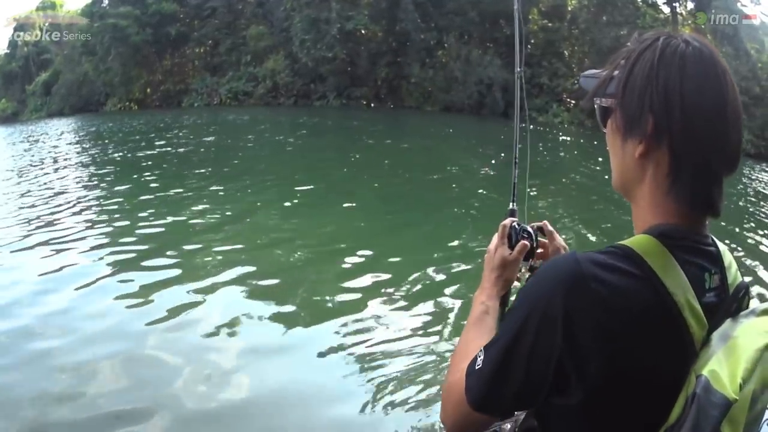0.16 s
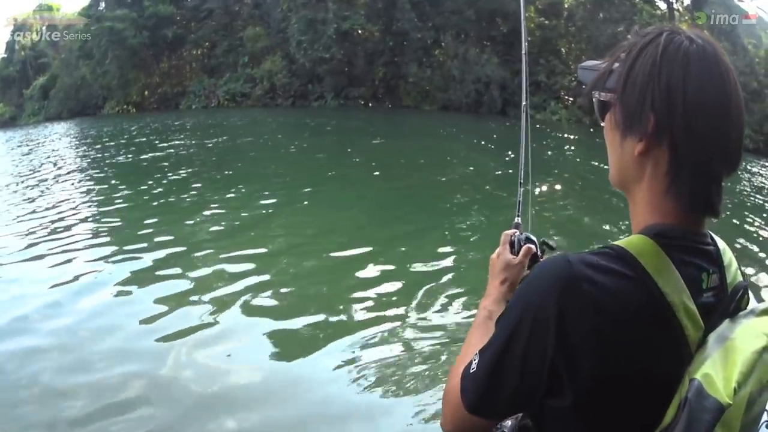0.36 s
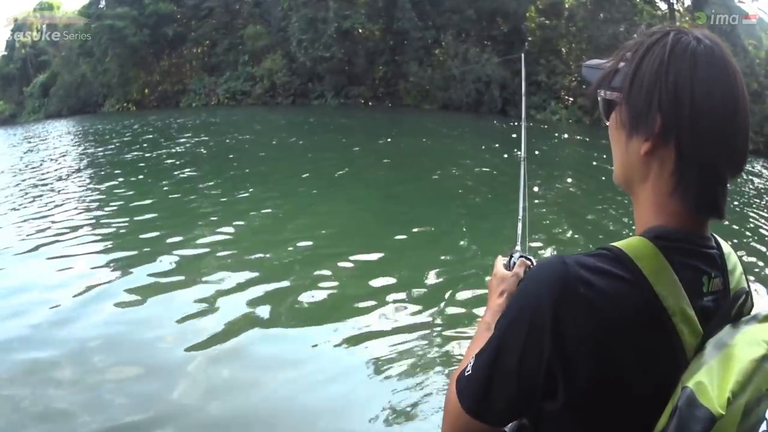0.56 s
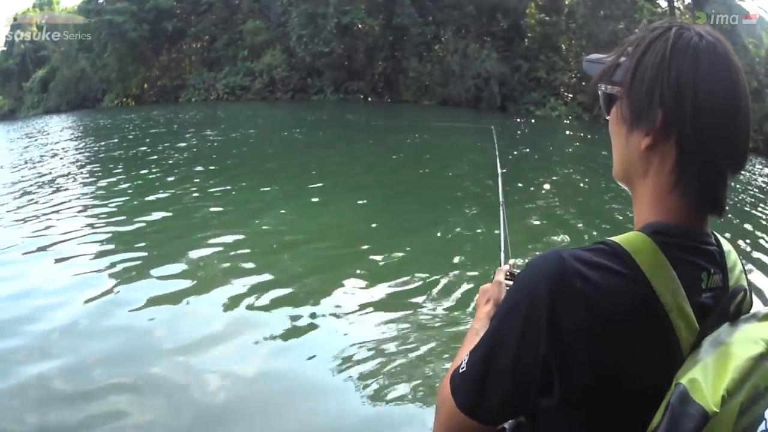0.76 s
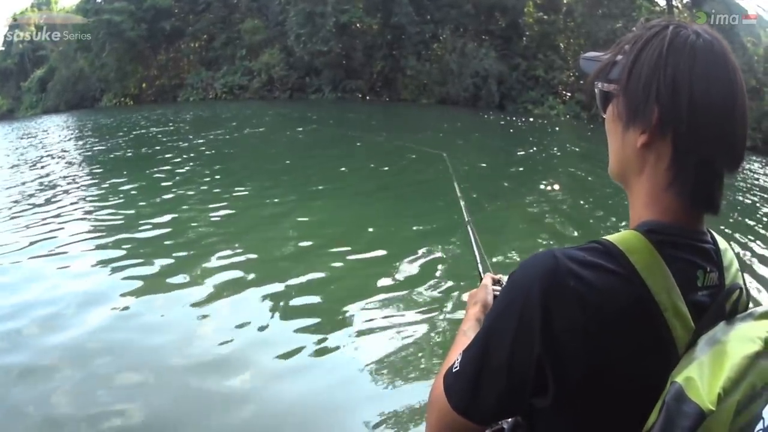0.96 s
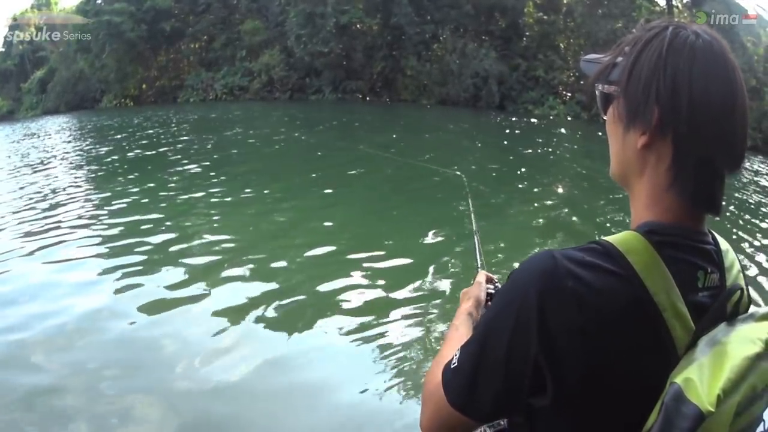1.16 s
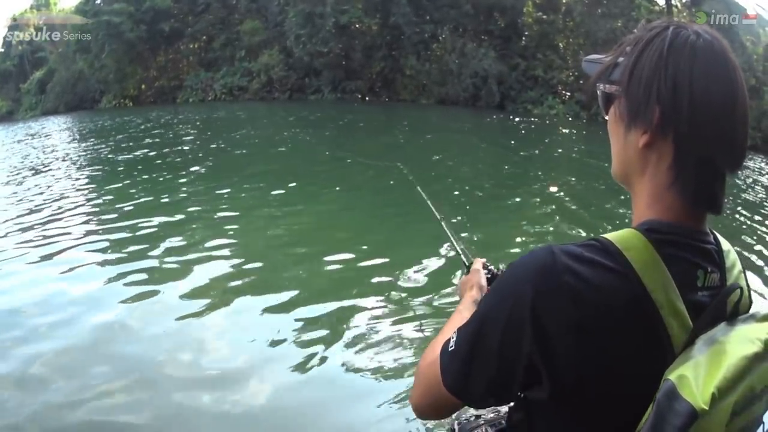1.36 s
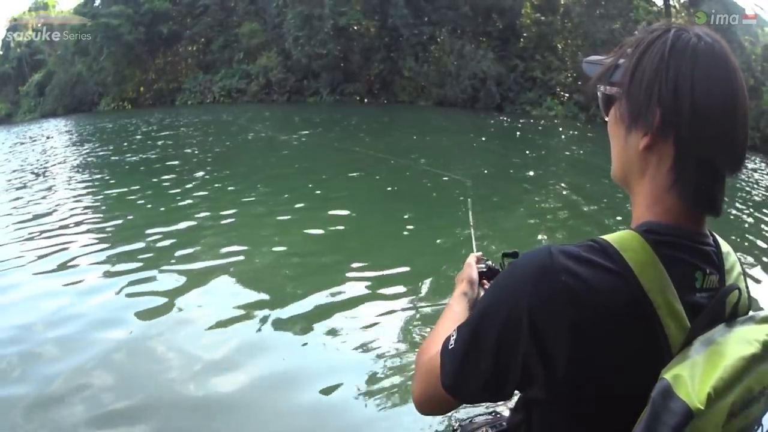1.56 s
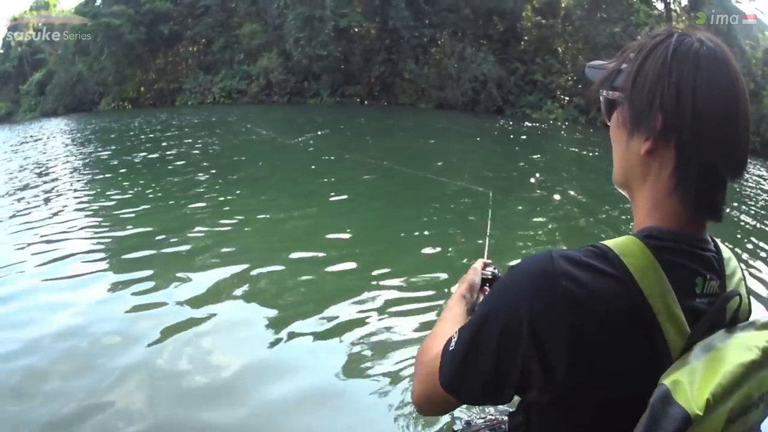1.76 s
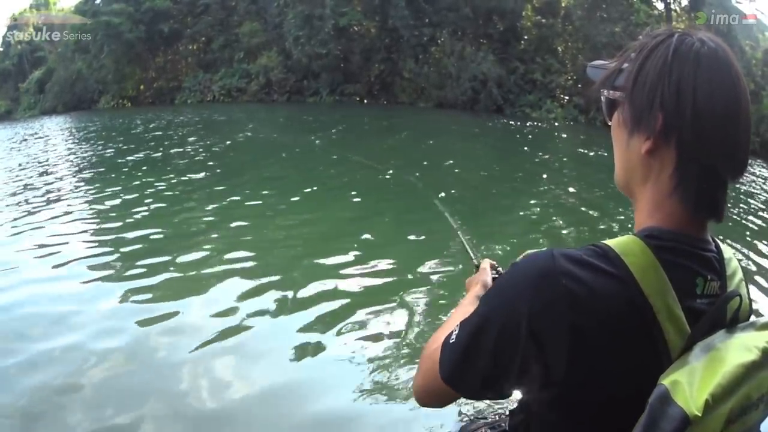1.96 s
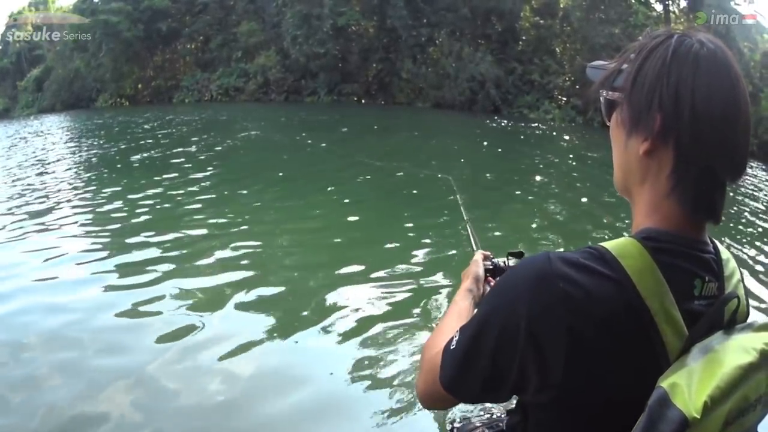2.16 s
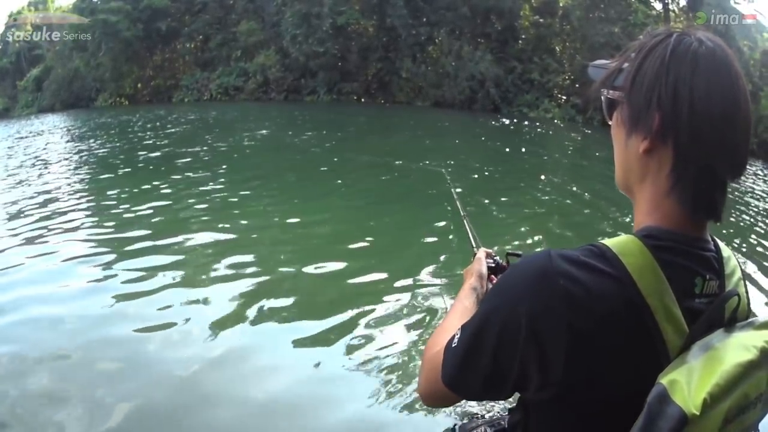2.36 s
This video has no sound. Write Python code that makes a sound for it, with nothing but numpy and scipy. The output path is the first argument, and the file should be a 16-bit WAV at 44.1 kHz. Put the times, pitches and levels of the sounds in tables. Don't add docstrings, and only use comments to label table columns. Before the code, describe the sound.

A fishing reel close to the microphone: a brief airy rod swish, two very quick metallic snaps with a springy ring, then a bird trilling in the trees, and finally light gear rubs and ticks beside a pond.

```python
import sys
import numpy as np
from scipy import signal
from scipy.fft import rfft, irfft
from scipy.io import wavfile
from scipy.ndimage import uniform_filter1d

SR = 44100
rng = np.random.default_rng(int(sys.argv[2]) if len(sys.argv) > 2 else 0)


def voltage_ratio(decibels):
    exponent = np.asarray(decibels, float) / 20
    return 10 ** exponent


def to_wav(sig):
    pcm = np.clip(np.atleast_2d(sig), -1, 1) * 32767
    pcm = np.round(pcm).astype(np.int16)
    wavfile.write(sys.argv[1], SR, pcm.T)


N = 105840

# frequency_hz, density_db
FRICTION_SPECTRUM = [(200, -30), (500, -5), (1200, -2), (2500, 0), (6000, -0.5), (10200, -4.5),
                     (11500, -17)]


def evened(x):
    return x / np.sqrt(np.mean(x ** 2) + 1e-20)


def read(points, hz):
    f, value = np.transpose(points)
    return np.interp(np.log(hz + 1), np.log(f + 1), value)


def add(mix, start_s, sound):
    part = mix[round(start_s * SR):][:len(sound)]
    part += sound[:len(part)]


def resonate(x, hz, width_hz):
    turn = np.exp(2j * np.pi * hz * np.arange(len(x)) / SR)
    r = np.exp(-np.pi * width_hz / SR)
    return 2 * (turn * signal.lfilter([1 - r], [1, -r], x / turn)).real


def coloured(points):
    gain = voltage_ratio(read(points, np.fft.rfftfreq(N, 1 / SR)))
    return evened(irfft(rfft(rng.standard_normal(N)) * gain, N))


def damped_modes(t, modes):
    return sum(voltage_ratio(db - 60 * t / t60) * np.sin(2 * np.pi * hz * t) for hz, db, t60 in modes)


def echoes(x, t60, gap_s):
    t = np.arange(SR // 2) / SR
    taps = rng.standard_normal((2, len(t))) * (rng.random((2, len(t))) < .3)
    taps = taps * voltage_ratio(-60 * t / t60) * (t > gap_s)
    taps = taps[0] + 0.8 * taps
    return signal.fftconvolve(x[None], taps / np.linalg.norm(taps[0]), axes=1)[:, :N]


def ports(pair, lead):
    # frequency_hz, left_minus_right_db
    contrast = [(60, -.3), (500, -.5), (1400, -1), (3000, -2), (6000, -1.3), (11000, -.8)]
    hz = np.fft.rfftfreq(N, 1 / SR)
    half = voltage_ratio(read(contrast, hz) / 2) * np.exp(.5j * read(lead, hz))
    return irfft(rfft(pair * np.ones((2, 1))) * np.array([half, 1 / half]), N)


def wash():
    # frequency_hz, density_db
    wash_spectrum = [(12, -33), (20, -6), (190, -2), (411, -6), (756, -6), (1390, -10), (1510, -9.5),
                     (7200, -18.5), (11300, -24), (14700, -43), (22000, -120)]
    # frequency_hz, likeness
    likeness = [(40, .88), (120, .85), (250, .65), (500, .52), (1000, .58), (2000, .66), (5000, .78),
                (11000, .88)]
    frames, hz = N // 256 + 5, np.fft.rfftfreq(1024, 1 / SR)
    a, b, c, d, patches = rng.standard_normal((frames, 513, 5)).T
    patches = uniform_filter1d(patches, size=20, axis=0)
    patches = evened(uniform_filter1d(patches, size=12, axis=1))
    same = np.clip(read(likeness, hz), -1, 1)[:, None]
    left = a + 1j * b
    right = same * left + np.sqrt(1 - same ** 2) * (c + 1j * d)
    rumble_db = .5 * patches[:1] * (hz[:, None] < 150)
    gain = voltage_ratio(read(wash_spectrum, hz)[:, None] + 0.94 * patches + rumble_db)
    noise = signal.istft(np.array([left, right]) * gain, nperseg=1024, noverlap=768)[1][:, :N]
    insects = evened(resonate(rng.standard_normal(N), hz=7230, width_hz=420))
    return voltage_ratio(-51) * evened(noise) + voltage_ratio(-68) * insects


def swish():
    peak_s, rise_s, fall_s, level_db = .29, 0.093, 0.045, -47
    t = np.arange(N) / SR - peak_s
    swell = np.exp(-(t / np.where(t < 0, rise_s, fall_s)) ** 2)
    return voltage_ratio(level_db) * swell * coloured(FRICTION_SPECTRUM)


def handle():
    # centre_s, length_s, level_db
    turns = [
        (1.493, 0.051, -52.5),
        (1.744, 0.055, -56.5),
        (2.056, 0.08, -55),
    ]
    # frequency_hz, width_hz, level_db
    gears = [(955, 30, -2), (2020, 120, -9), (10400, 500, -10)]
    # start_s, peak_db, pitch_hz,
    # t60_s
    ticks = [(.2005, -39, 6000, .003), (0.896, -41, 1200, .002), (1.452, -51, 10100, .02),
             (1.492, -38, 6000, .003), (1.508, -43, 10400, .03), (1.508, -37, 2010, 0.016),
             (1.537, -31.5, 6000, .003), (1.551, -44, 10560, 0.022), (1.718, -34.5, 5240, 0.008),
             (1.759, -38.5, 2020, 0.016), (1.763, -45, 10700, .012), (1.763, -37.5, 5700, 0.0072),
             (1.808, -46.5, 10540, 0.033), (1.883, -35, 5000, 0.0035), (2.019, -38, 2300, 0.0094),
             (2.026, -44, 8200, .015), (2.035, -40, 2030, 0.018), (2.049, -42, 7400, 0.011),
             (2.057, -45, 2030, .012), (2.069, -42, 3520, 0.023), (2.091, -29.5, 6500, 0.0024),
             (1.472, -44, 956, 0.13), (2.030, -47, 965, 0.072), (1.736, -47, 867, 0.11),
             (2.091, -30.5, 9600, 0.0029)]
    rub_db, slips_per_s = 2.5, 900
    t, out = np.arange(N) / SR, np.zeros(N)
    slips = rng.random(N) < slips_per_s / SR
    grit = evened(rng.standard_normal(N) * (0.42 + slips * 3))
    body = voltage_ratio(rub_db) * coloured(FRICTION_SPECTRUM)
    for hz, width_hz, db in gears:
        body = body + voltage_ratio(db) * evened(resonate(grit, hz, width_hz))
    for centre_s, length_s, db in turns:
        out += body * voltage_ratio(db) * np.exp(-(2 * (t - centre_s) / length_s) ** 2)
    t = t[:2000]
    onset = 1 - np.exp(-t / 0.00058)
    for start_s, db, hz, t60 in ticks:
        edge = voltage_ratio(-6) * np.exp(-t / 0.0013) * rng.standard_normal(len(t))
        add(out, start_s, voltage_ratio(db) * onset * (damped_modes(t, [(hz, 0, t60)]) + edge))
    return out


def latch():
    # start_s, level_db, thud_db, crack_s, ring_db
    blows = [
        (.2292, -25, 11, 0.0014, -6),
        (0.231, -34, -19, .0008, 0),
        (0.234, -37.5, -10, .001, 7),
        (0.2399, -20.5, -12, 0.00037, -27),
        (0.2411, -15, -9, 0.0027, -3),
        (.2452, -37, -12, .001, 17),
        (0.2504, -46, 27.5, .001, 20.5),
    ]
    # frequency_hz, level_db, t60_s
    frame_modes = [(720, -22, .03), (1420, -15, .03), (1990, -15, .04), (3300, -9, .01), (4550, -6, .012),
                   (5500, -10, .012), (6350, -1, .014), (8800, -6, .008)]
    # frequency_hz, level_db, t60_s
    spring_modes = [(10195, 0, .026), (10470, -1, .022), (10900, -9, .012)]
    thud_hz, thud_t60, crack_db, contact_s = 2300, 0.0056, 4, 0.00031
    t, out = np.arange(8000) / SR, np.zeros(N)
    frame = damped_modes(t, frame_modes)
    shimmer = evened(resonate(rng.standard_normal(len(t)), hz=10400, width_hz=210))
    spring = damped_modes(t, spring_modes) + voltage_ratio(-25 - 60 * t / 0.27) * shimmer
    for start_s, db, thud_db, crack_s, ring_db in blows:
        thud = damped_modes(t, [(thud_hz, thud_db, thud_t60)])
        crack = voltage_ratio(crack_db) * np.exp(-t / crack_s) * np.diff(rng.standard_normal(len(t) + 1))
        blow = frame + thud + crack + voltage_ratio(ring_db) * spring
        add(out, start_s, voltage_ratio(db) * (1 - np.exp(-t / contact_s)) * blow)
    out = signal.sosfilt(signal.butter(3, 450, "high", fs=SR, output="sos"), out)
    dulled = signal.sosfilt(signal.butter(1, 5000, fs=SR, output="sos"), out)
    return out + voltage_ratio(-10) * echoes(dulled, t60=0.24, gap_s=.008)


def note(length_s, db, top_hz, end_hz, sag, leap_s, settle, rise_s, rasp):
    # frequency_hz, level_db
    beak = [(2500, -14.5), (3400, -20), (4500, -2), (5700, 2), (6500, -1.5), (8000, -10.5), (9000, -20),
            (10500, -21)]
    start_hz, fall_s, waver_share, flutter_db, rasp_hz = 1070, 0.013, 0.0075, 2.5, 350
    t = np.arange(0, length_s, 1 / SR)
    fallen = np.clip((t - leap_s) / (length_s - leap_s) / settle, 0, 1)
    leap = np.sin(np.pi / 2 * np.minimum(t / leap_s, 1)) ** 2
    hz = start_hz + (top_hz - start_hz) * leap - (top_hz - end_hz) * fallen ** sag
    drift = uniform_filter1d(rng.standard_normal((8000, 2)), size=150, axis=0)[:len(t)]
    waver, flutter = drift.T * np.sqrt(150)
    pole = np.exp(-2 * np.pi * rasp_hz / SR)
    grit = signal.lfilter([1], [1, -pole], rng.standard_normal((8000, 10)), axis=0)[:len(t)].T
    hz = hz * (1 + waver_share * waver)
    phase = 2 * np.pi * np.cumsum(hz) / SR
    tone = np.zeros(len(t))
    for k in range(2, 10):
        roughness = 1 + rasp * evened(grit[k])
        tone += voltage_ratio(read(beak, k * hz)) * np.cos(k * phase + k * k) * roughness
    envelope = np.clip(np.minimum(t / rise_s, (length_s - t) / fall_s), 0, 1)
    return envelope * voltage_ratio(db + flutter_db * flutter) * evened(tone)


def bird():
    # start_s, length_s, level_db, top_hz, end_hz
    opening = [
        (.546, .132, -50.5, 1145, 1052),
    ]
    trill = [
        (0.715, .062, -47.5, 1204, 1053),
        (0.809, 0.047, -45.5, 1225, 1063),
        (0.894, 0.051, -48, 1252, 1070),
        (0.97, .046, -48.5, 1220, 1070),
        (1.051, 0.046, -48.5, 1216, 1020),
        (1.146, .05, -50.5, 1205, 1062),
    ]
    closing = [
        (1.321, .08, -47, 1225, 1111),
    ]
    # sag_power, leap_s, settle_share of the fall time, rise_s
    opening_law = (.85, .012, 1.2, 0.015)
    trill_law = (1.143, 0.01707, 0.84, 0.01)
    closing_law = (0.88, 0.0239, 0.9, 0.011)
    out = np.zeros(N)
    parts = (opening, opening_law, .18), (trill, trill_law, .45), (closing, closing_law, .12)
    for notes, law, rasp in parts:
        for start_s, *shape in notes:
            add(out, start_s, note(*shape, *law, rasp))
    out = out + voltage_ratio(-6) * np.roll(out, round(.00183 * SR))
    return out + voltage_ratio(-1) * echoes(out, t60=.55, gap_s=0.0069)


def bumps():
    # start_s, peak_db, pitch_hz, length_s
    knocks = [(0.7, -43, 94.4, 0.02), (0.719, -53, 56.3, 0.11), (1.998, -54, 45.6, .1),
              (2.045, -39, 91, 0.029), (2.068, -41, 99.3, 0.044), (2.2, -52, 90, 0.081),
              (.91, -56, 64.6, 0.043), (2.13, -44.5, 110, .015), (2.17, -48, 78.5, .02),
              (2.215, -58, 93, 0.019), (2.275, -57, 91.5, 0.013)]
    out = np.zeros(N)
    for start_s, db, hz, length_s in knocks:
        t = np.arange(0, length_s, 1 / SR)
        swell = np.sqrt(abs(np.sin(np.pi * t / length_s)))
        add(out, start_s, voltage_ratio(db) * swell * np.sin(2 * np.pi * hz * t))
    return out


def scene():
    # frequency_hz, left_lead_rad
    far_lead = [(30, .3), (200, .6), (600, 1.9), (1700, 2.3), (3700, 1.2), (7600, .45), (11500, .2)]
    # frequency_hz, left_lead_rad
    near_lead = [(60, .65), (860, 1.75), (2700, 1.5), (5000, .8), (9900, .4), (11800, .5)]
    far = wash() + swish() + bird()
    near = handle() + latch() + bumps()
    return ports(far, far_lead) + ports(near, near_lead)


def roll_off(x):
    return signal.sosfilt(signal.butter(12, 12260, fs=SR, output="sos"), x)


def record(dry):
    lowpass = signal.firwin(511, 11010, window=("kaiser", 4.5), fs=SR)
    mix = signal.oaconvolve(dry, lowpass[None], "same")
    return roll_off(mix)


dry = scene()
out = record(dry)
to_wav(out)
```